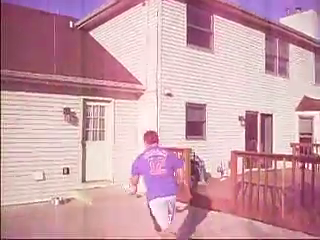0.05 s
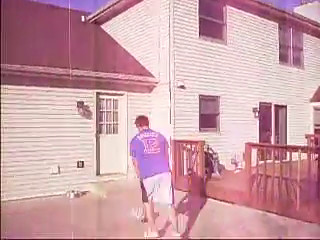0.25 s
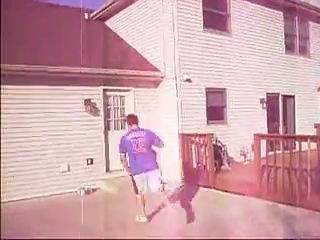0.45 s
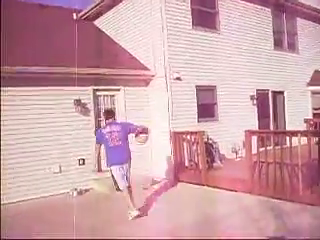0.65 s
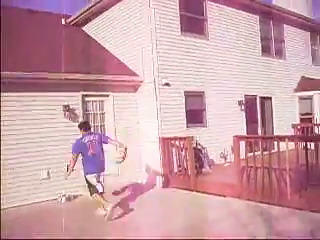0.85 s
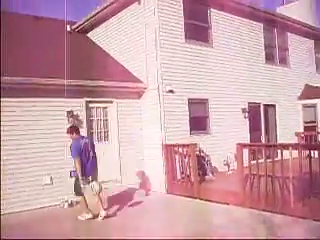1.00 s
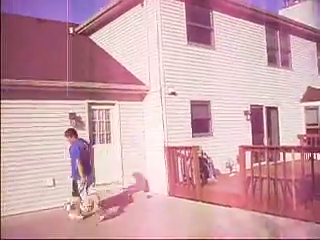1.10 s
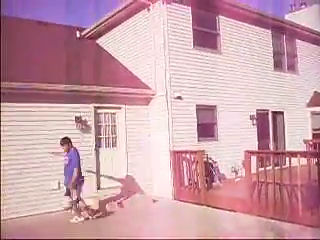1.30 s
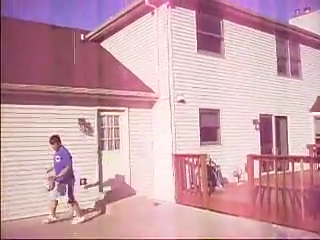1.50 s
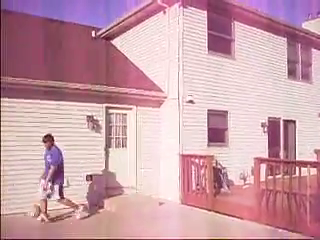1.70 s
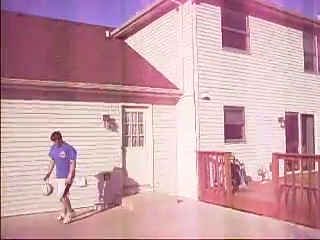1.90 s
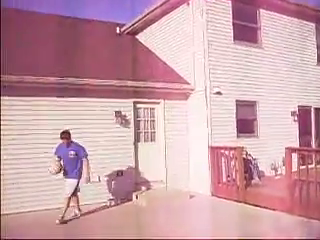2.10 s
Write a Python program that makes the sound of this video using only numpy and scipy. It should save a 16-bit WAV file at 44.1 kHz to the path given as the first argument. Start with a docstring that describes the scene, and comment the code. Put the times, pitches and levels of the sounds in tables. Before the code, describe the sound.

A basketball bounces on a concrete patio beside a house. Shoes scuff, click and faintly squeak, then at 0.3 seconds the ball lands with a loud slap, low thump and brief hollow ring, echoing off nearby walls. A softer bounce follows at 1.2 seconds and the hardest at 1.8. Quieter footsteps thud and scuff in between, while light wind rumbles on the dull microphone.

```python
"""A concrete patio beside a house, heard on a small, dull microphone in light wind.
Shoes scuff, click and squeak; then, at 0.3 s, a basketball lands: a slap, a low thump and a brief,
hollow ring, thrown back by the near wall and, later and thinner, from across the yard.
Steps thud on and gusts rumble on the microphone as the ball bounces again at 1.2 s and 1.8 s,
each time closer to the wall. The hardest slap clips the recorder."""
import sys
import numpy as np
from scipy import signal
from scipy.io import wavfile
from scipy.ndimage import uniform_filter1d

SR = 44100
rng = np.random.default_rng(int(sys.argv[2]) if len(sys.argv) > 2 else 0)


def inscribe(sig):
    """Save sig as 16-bit PCM at rate SR to the path in sys.argv[1].

    A 1-D sig is mono; a 2-D sig holds one channel per row.
    Samples are clipped to [-1, 1] before scaling.
    """
    pcm = np.round(np.clip(np.atleast_2d(sig).T, -1, 1) * 32767)
    wavfile.write(sys.argv[1], SR, pcm.astype(np.int16))


N = 94815
T = np.arange(int(.7 * SR)) / SR  # time axis of one event, t/s

# ball on concrete: t/s, slap/dB, pock/dB, skin/dB, thump/dB, thump f/Hz, ring/dB,
# wall delay/s, wall echo/dB, second delay/s, second echo/dB, scatter/dB
BOUNCES = [(0.2802, 16.5, -9.5, -9, -7.5, 212.4, -21, .0159, -6.5, .0095, -7.5, -6.5),
           (1.2132, 9.5, -15.5, -20, -17, 200, -33, 0.012, -3, 0.015, -17, -4.5),
           (1.8121, 18, -9, -22, -14, 148, -38, .0071, -4.5, 0.02, -17.5, -8)]
# tones of the hollow ring after a bounce, coloured by nearby reflections: f/Hz, relative level/dB
RING_TONES = [(741, -1), (828, 2), (873, 0), (1009, -2), (1122, -4), (1281, -2), (1367, 1), (2574, -5),
              (2637, -3), (2936, -4), (3956, -7), (4087, -6), (4165, -7), (4660, -7)]
# shoes and hands landing: t/s, thud/dB, thud f/Hz, knock/dB, knock f/Hz
LANDINGS = [(0.0604, -26.5, 302, -52, 800), (.082, -34, 302, -27.5, 1070), (0.125, -30.5, 417, -31.5, 1200),
            (.456, -30, 303, -61.5, 700), (.474, -32, 200, -47, 700), (.547, -26, 113, -38.5, 295),
            (0.559, -30.5, 100, -51, 300), (.843, -33.5, 130, -30.5, 1000), (0.899, -31, 200, -49, 700),
            (1.004, -22.5, 240, -30.5, 1100), (1.012, -19, 125, -28.5, 600), (1.054, -25, 70, -43, 600),
            (1.117, -29, 129.9, -43, 600), (1.175, -34, 170, -36, 926), (1.4873, -20, 238, -25.5, 396),
            (1.506, -23, 85, -55, 397), (1.519, -24, 90, -38, 395), (1.527, -36, 200, -31.5, 560),
            (1.636, -26.5, 175, -31.5, 500), (1.644, -29.5, 340, -27.5, 783),
            (1.850, -17.5, 184, -24.5, 600), (1.8605, -23.5, 270, -23.5, 597),
            (1.871, -24.5, 220, -23, 850), (2.002, -43.5, 170, -29, 650)]
# soles and clothes rubbing: t/s, rise/s, decay/s, body/dB, grit/dB
SCUFFS = [(0, 0.044, 0.026, -39.5, -43), (.050, .011, 0.022, -28.5, -37.5), (.125, 0.0034, 0.057, -40, -50),
          (.405, 0.0078, 0.036, -39, -37.5), (0.439, 0.021, 0.015, -38, -42),
          (0.654, .008, 0.012, -55, -51), (.838, 0.0027, 0.03, -34, -45.5), (.86, .14, 0.16, -43, -84),
          (1.173, 0.007, 0.1, -40, -48), (1.384, 0.016, 0.017, -41.5, -49.5),
          (1.643, 0.0022, 0.01, -35.5, -38.5), (1.671, 0.017, 0.0097, -42.5, -70),
          (2.07, 0.0084, 0.11, -49.5, -51.5)]
# rubber sole squeaking: t/s, f/Hz, level/dB, half length/s
SQUEAKS = [(0.089, 711.6, -32.5, 0.021), (1.552, 2240, -42, 0.0032)]
# hard soles and grit clicking: t/s, relative level/dB
CLICKS = [(.0540, -22.5), (0.061, -21.5), (0.8409, -23), (1.6445, -31.5)]
# returns from distant walls: t/s, level/dB
FAR_ECHOES = [(.3960, -10), (0.947, -26.5), (1.9460, -14.5), (2.096, -21)]
# wind strength at the microphone: t/s, level/dB
GUSTS = [(0, -39.5), (.2, -67), (.32, -50), (.5, -46), (.75, -49), (.95, -38.5), (1.02, -35.5), (1.12, -45),
         (1.3, -38), (1.4, -64), (1.52, -35.5), (1.591, -40.5), (1.68, -40.5), (1.77, -44), (1.95, -37),
         (2.15, -44.5)]

# spectra: f/Hz, relative level/dB
SLAP_EQ = [(100, -12), (600, -24.5), (1250, -0.5), (1750, -8), (2100, -4.5), (2400, -8), (3000, -15),
           (3700, -2.5), (4800, -5), (6500, -13)]  # ball striking concrete
SCATTER_EQ = [(80, 7), (140, 0.5), (260, 1.5), (420, 3.5), (900, -1), (1800, 8.5), (3000, -0.5),
              (5500, 2.5)]  # reflections off siding and deck
BODY_EQ = [(80, -4.5), (250, -6.5), (450, -2), (850, -0.5), (1300, -11), (2000, -28), (5000, -33)]  # dull part of scuffs and knocks
GRIT_EQ = [(300, -41.5), (1200, -10.5), (2100, 10.5), (3000, 8), (4800, 2.5), (6000, -9)]  # bright part of scuffs
CLICK_EQ = [(300, -25.5), (900, -4), (1500, -9.5), (2200, -10), (3000, -1), (4800, 0), (6000, -7)]  # grit under a sole
YARD_EQ = [(80, -11.5), (250, -2), (600, -1.5), (1400, -3), (2100, 5), (3000, -1), (3900, 1.5), (5500, -5)]  # reverberation of the yard
HUSH_EQ = [(20, 6), (60, -1), (130, 0.5), (260, -10.5), (430, -13), (620, -14.5), (900, -13), (1500, -17.5),
           (3000, -25), (5000, -25), (6500, -40)]  # open air
WIND_EQ = [(15, -9), (40, -0.5), (70, -6), (130, -10), (250, -12.5), (500, -21.5), (1500, -42.5)]  # rumble on the microphone

POCK_HZ, POCK_RISE_S = 3040, 0.00035
SKIN_HZ, SKIN_RISE_S = 841, 0.0013
THUMP_DELAY_S, THUMP_RISE_S, RING_T60_S = 0.00112, 0.0026, .08
SCATTER_DELAY_S, SCATTER_RISE_S, SCATTER_TAIL_DB, SCATTER_T60_S = .002, 0.008, -8, 0.23
THUD_RISE_S, KNOCK_RISE_S, RATTLE_DB, RATTLE_DECAY_S = 0.0026, 0.0013, -13, 0.013
CLICK_DECAY_S = 0.0036
YARD_DB, YARD_T60_S, HUSH_DB = -16.5, 0.7, -46
BANDWIDTH_HZ, CLIP_LEVEL, OUTPUT_CUTOFF_HZ = 5650, .76, 16500


def ball():
    """Each bounce slaps, flexes the skin, thumps and rings; near walls, siding and deck return it."""
    out = np.zeros(N)
    spread = swell(SCATTER_RISE_S) ** 2 + amp(SCATTER_TAIL_DB - 60 * T / SCATTER_T60_S)
    for (s, slap_db, pock_db, skin_db, thump_db, thump_hz, ring_db,
         wall_s, wall_db, second_s, second_db, scatter_db) in BOUNCES:
        slap = amp(pock_db) * swell(POCK_RISE_S) * np.cos(2 * np.pi * POCK_HZ * T)  # hollow pock
        add(slap, 0, amp(slap_db) * colour(SLAP_EQ))  # broadband crack
        skin = amp(skin_db) * push(SKIN_HZ, SKIN_RISE_S)
        thump = amp(thump_db) * push(thump_hz, THUMP_RISE_S)
        hit = amp(ring_db) * bounce_ring()
        add(hit, 0, slap)
        add(hit, THUMP_DELAY_S, skin + thump)
        add(out, s, hit)
        add(out, s + wall_s, amp(wall_db) * hit)
        add(out, s + second_s, amp(second_db) * slap)
        scatter = through(hit, reflections(spread, SCATTER_EQ))
        add(out, s + SCATTER_DELAY_S + wall_s / 2, amp(scatter_db) * scatter)
    return out


def bounce_ring():
    """A brief, hollow ring after each bounce, coloured by nearby reflections."""
    return sum(amp(db - 60 * T / RING_T60_S) * np.sin(2 * np.pi * (hz * T + rng.random()))
               for hz, db in RING_TONES) / 2


def landings():
    """Shoes and hands land with a dull thud and a rattling knock."""
    out = np.zeros(N)
    for s, thud_db, thud_hz, knock_db, knock_hz in LANDINGS:
        rattle = amp(RATTLE_DB) * np.exp(-T / RATTLE_DECAY_S) * noise(BODY_EQ, len(T))
        knock = push(knock_hz, KNOCK_RISE_S) + rattle
        add(out, s, amp(thud_db) * push(thud_hz, THUD_RISE_S) + amp(knock_db) * knock)
    return out


def scuffs():
    """Soles and clothes rub in grainy bursts of noise."""
    out = np.zeros(N)
    for s, rise_s, decay_s, body_db, grit_db in SCUFFS:
        envelope = np.minimum(T / rise_s, 1) * np.exp(-np.maximum(T - rise_s, 0) / decay_s)
        grain_db = 2.7 * unit(uniform_filter1d(rng.standard_normal(len(T)), size=60))
        rub = amp(body_db) * noise(BODY_EQ, len(T)) + amp(grit_db) * noise(GRIT_EQ, len(T))
        add(out, s, envelope * unit(amp(grain_db)) * rub)
    return out


def squeaks():
    """A rubber sole squeaks in short, bell-curved tones."""
    out = np.zeros(N)
    for s, hz, db, half_s in SQUEAKS:
        t = np.arange(N) / SR - s
        out += amp(db) * np.exp(-(t / half_s) ** 2) * np.sin(2 * np.pi * hz * t)
    return out


def sole_clicks():
    """Grit under a hard sole gives short, bright bursts."""
    out = np.zeros(N)
    for s, db in CLICKS:
        add(out, s, amp(db) * np.exp(-T / CLICK_DECAY_S) * noise(CLICK_EQ, len(T)) / 2)
    return out


def yard_tail(sound):
    """The yard answers with faint, dense reflections."""
    decay = amp(-60 * T / YARD_T60_S)
    return amp(YARD_DB) * through(sound, reflections(decay, YARD_EQ))


def far_echoes():
    """Thin ticks come back from walls across the yard."""
    out = np.zeros(N)
    tick = colour([(150, -16), (900, 11.5), (3000, 8.5), (5500, -5)])  # f/Hz, level/dB
    for s, db in FAR_ECHOES:
        add(out, s, amp(db) * tick)
    return out


def open_air():
    """A steady outdoor hush, with gusts rumbling on the microphone."""
    gusts = amp(np.interp(np.arange(N) / SR, *np.transpose(GUSTS)))
    return amp(HUSH_DB) * noise(HUSH_EQ, N) + gusts * noise(WIND_EQ, N)


def amp(db):
    """Decibels to gain."""
    return 10 ** (np.asarray(db) / 20)


def unit(x):
    """Scales to rms 1."""
    return x / np.sqrt(np.mean(x ** 2) + 1e-20)


def add(mix, s, sound):
    """Mixes a sound in at s seconds."""
    part = mix[max(round(s * SR), 0):][:len(sound)]
    part += sound[:len(part)]


def colour(points, size=4096):
    """Minimum-phase impulse response with the given spectrum."""
    hz, db = np.transpose(points)
    bin_hz = abs(np.fft.fftfreq(size, 1 / SR))
    log_gain = np.log(amp(np.interp(np.log(bin_hz + 1), np.log(hz), db)))
    return np.fft.ifft(np.exp(np.conj(signal.hilbert(log_gain)))).real


def through(x, response):
    """Convolves, keeping the length."""
    return signal.fftconvolve(x, response)[:len(x)]


def noise(points, size):
    """Coloured noise of rms 1."""
    white = rng.standard_normal(size + 4095)
    return unit(signal.fftconvolve(white, colour(points), "valid"))


def swell(rise_s):
    """Envelope that peaks at rise_s, then dies away."""
    return T / rise_s * np.exp(1 - T / rise_s)


def push(hz, rise_s):
    """A heavily damped swing."""
    return swell(rise_s) ** 2 * np.sin(2 * np.pi * hz * T)


def reflections(envelope, points):
    """Dense random reflections of energy 1 under an envelope, then coloured."""
    taps = rng.choice([-1., 1.], len(T)) * envelope
    return through(taps / np.linalg.norm(taps), colour(points))


def scene():
    """Ball and player in front, the yard and the open air behind, in mono."""
    play = ball() + landings() + scuffs() + squeaks() + sole_clicks()
    return (play + yard_tail(play) + far_echoes() + open_air())[None]


def record(dry):
    """A dull microphone into a recorder that clips on the hardest slap."""
    mic_lowpass = signal.firwin(141, BANDWIDTH_HZ, window=("kaiser", 8), fs=SR)
    output_lowpass = signal.firwin(255, OUTPUT_CUTOFF_HZ, window=("kaiser", 8), fs=SR)
    dull = signal.oaconvolve(dry, mic_lowpass[None], "same")
    clipped = np.clip(dull, -CLIP_LEVEL, CLIP_LEVEL)
    return signal.oaconvolve(clipped, output_lowpass[None], "same")


dry = scene()
out = record(dry)
inscribe(out)
```